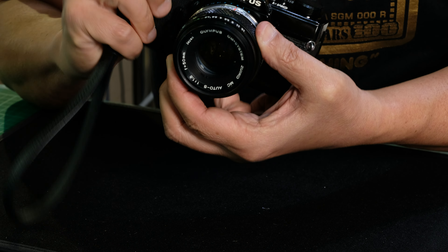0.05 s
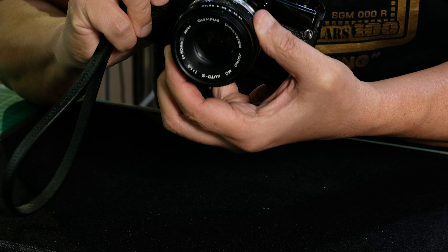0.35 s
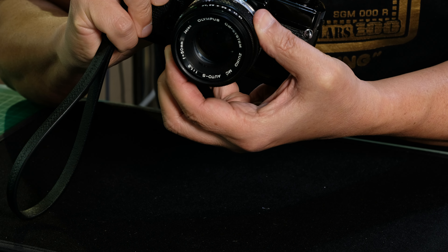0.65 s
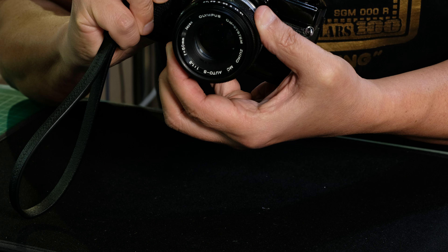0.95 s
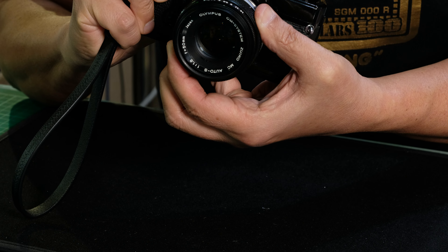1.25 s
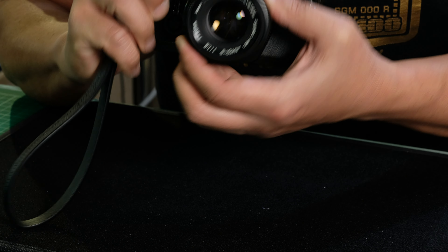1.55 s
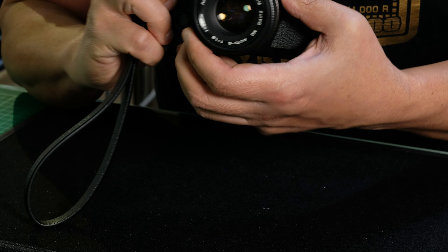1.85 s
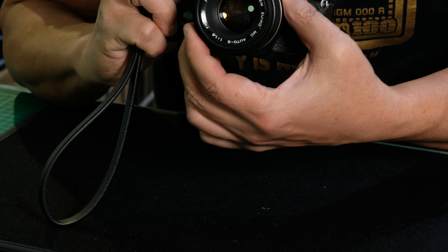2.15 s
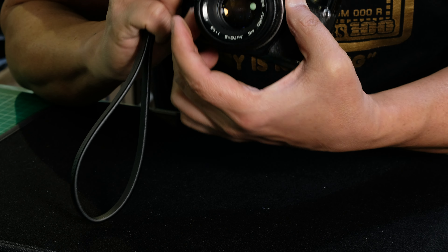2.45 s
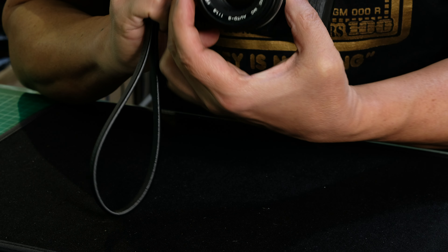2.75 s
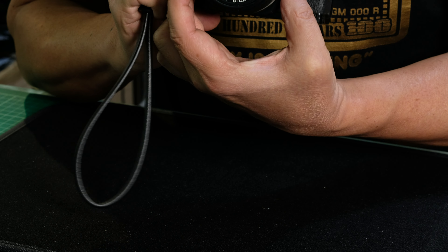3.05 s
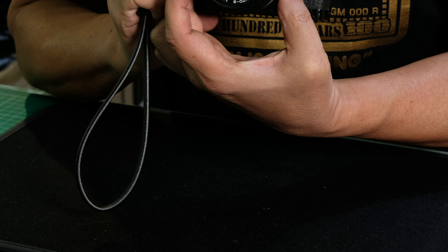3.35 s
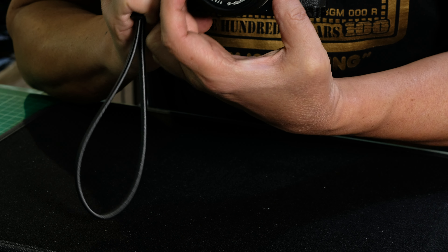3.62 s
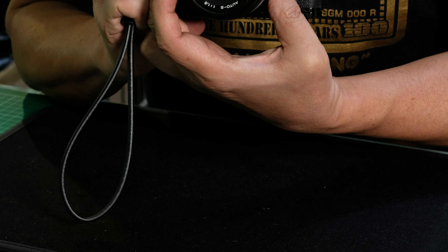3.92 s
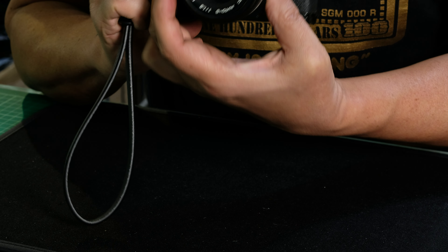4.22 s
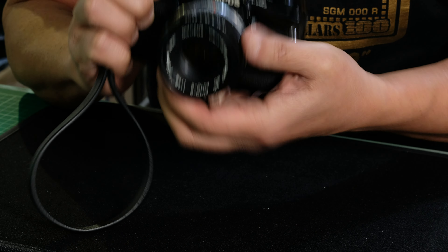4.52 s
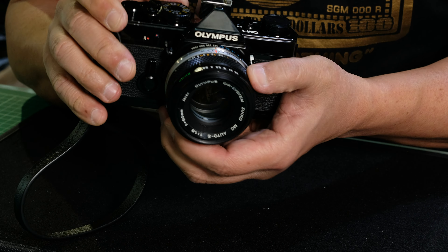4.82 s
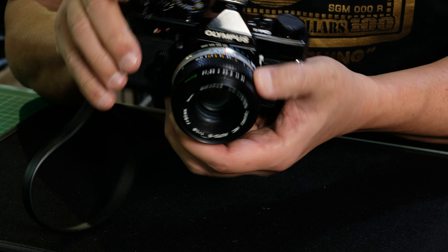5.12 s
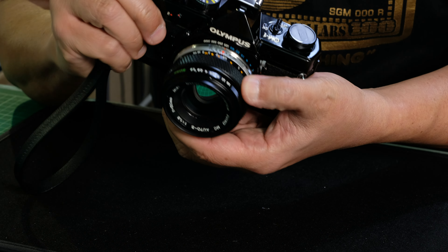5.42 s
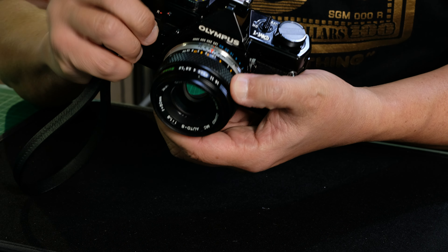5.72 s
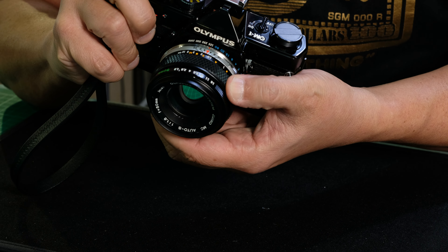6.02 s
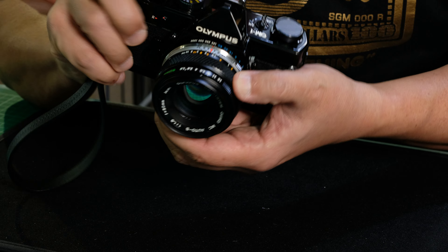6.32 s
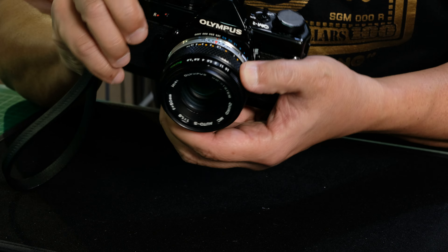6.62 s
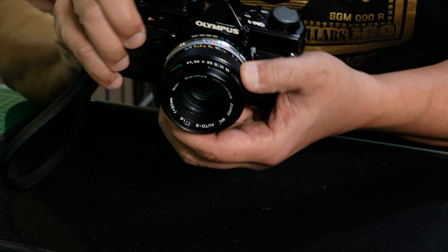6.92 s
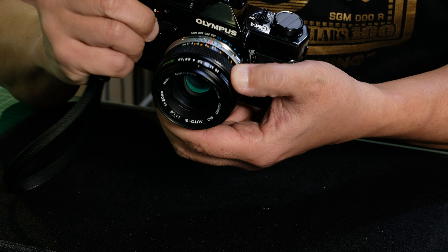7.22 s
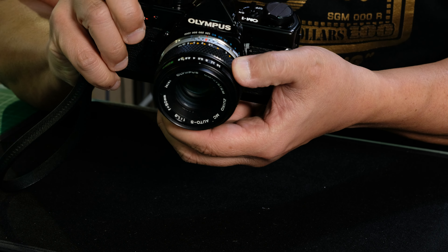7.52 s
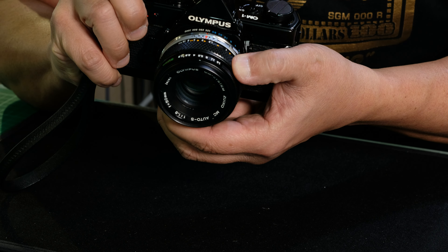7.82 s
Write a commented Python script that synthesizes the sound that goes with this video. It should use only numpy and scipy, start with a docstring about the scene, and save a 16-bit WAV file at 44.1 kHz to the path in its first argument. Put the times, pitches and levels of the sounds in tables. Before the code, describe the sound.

Close up in a small room with faint rumble and hiss, a film camera is worked by hand. After a small ring click comes a slow exposure: two sharp metallic clicks with a soft clockwork whirr between them. Light finger taps and rubs follow. Then, twice over, the film lever gives a short ratcheting rasp and the shutter fires fast, with another ring click before the first of these shots.

```python
"""A soft rub and the click of a speed ring, then a mechanical film camera fires three times, close up
in stereo in a small, quiet room. The first exposure is slow and its escapement whirrs; between shots
fingers tap and rub the body, the film lever ratchets and the ring clicks again.
Blows are fast-dying noise bursts that ring the metal parts; sliding is noise in grains of uneven size.
A short room tail, rumble, hiss and hum lie underneath."""
import sys
import numpy as np
from scipy import signal
from scipy.fft import rfft, irfft, next_fast_len
from scipy.io import wavfile
from scipy.ndimage import uniform_filter1d

SR = 44100
rng = np.random.default_rng(int(sys.argv[2]) if len(sys.argv) > 2 else 0)


def materialize(psi):
    """Save the field psi as 16-bit PCM at rate SR to the path in sys.argv[1].

    A 1-D psi becomes a single channel; in a 2-D psi each row is a channel.
    """
    bounded = np.clip(np.atleast_2d(psi).T, -1, 1)
    quanta = np.round(bounded * 32767).astype(np.int16)
    wavfile.write(sys.argv[1], SR, quanta)


N = 355429
LEAD_S = .004  # scrape ahead of each blow

# Spectra of shutter, film winder and controls: f/Hz, level/dB
SHUTTER_TONE = [(200, -34), (400, -24.5), (680, -13.5), (900, -17), (1600, -16), (1950, -9.5), (2800, -6),
                (5200, -5), (7400, -1.5), (9200, -2), (10400, -9), (12100, 1), (14800, -4), (16000, -14)]
WINDER_TONE = [(180, -56), (300, -23.5), (787, -5.5), (1510, -9.5), (3130, -4), (4230, -6.5), (4750, -8),
               (7950, -2), (10400, -12), (11300, -6.5), (12500, -5.5), (15200, -10), (16000, -8.5)]
CONTROL_TONE = [(300, -28.5), (700, -19.5), (1060, -10), (1380, -25), (1850, -7), (2450, -5), (3500, -4.5),
                (4200, -2), (5200, -4.5), (7500, 2.5), (8700, -3), (9700, -0.5), (11000, -2.5),
                (16000, -4.5)]
# Direct sound: f/Hz, left-right correlation
NEAR_CORRELATION = [(300, .92), (600, 1), (1100, 0.51), (2200, 1), (4400, 0.69), (8000, .66), (15000, .48)]
# Exposures: release/s, close/s, opening/dB, closing/dB, extra closing knock/dB, button up/s, button/dB
SHOTS = [(0.6131, 1.2364, -10, -13, -3.5, 1.4583, -22.5), (6.0979, 6.1656, -8.5, -11.5, -0.5, 6.2942, -21),
         (7.8082, 7.8762, -9, -12.5, 1.5, 7.995, -21.5)]
# Latch frees mirror; mirror hits, chatters, settles; first curtain meets its brake, slides, stops:
# delay/s, level/dB, t60/s, ring/Hz, knock/dB, brightness/dB
OPENING = [(0, -5, 0.012, 12270, -9.5, -2.5), (.0079, 0.5, 0.0046, 12300, -5.5, 0),
           (.0094, -5.5, .016, 7400, -5.5, -2.5), (.036, -20.5, .013, 7200, 17, -2),
           (.0518, -19, .008, 6770, 1.5, -3.5), (.054, -12.5, .008, 12040, -1.5, -4),
           (.0569, -1, .008, 11200, -6.5, 1.4)]
# Film lever strokes: end stop/s, level/dB, time stretch of the tooth run
STROKES = [(5.5435, -14, .992), (7.1674, -13.5, 1.025)]


def amp(db):
    """Decibels to gain."""
    return 10 ** (np.asarray(db) / 20)


def unit(x):
    """Scale to rms 1."""
    return x / np.sqrt(np.mean(x ** 2) + 1e-20)


def along(points, hz):
    """Interpolate (f/Hz, value) points on a log axis."""
    f, v = np.transpose(points)
    return np.interp(np.log(hz + 1), np.log(f), v)


def filtered(x, response):
    """Apply a complex frequency response."""
    size = next_fast_len(N + SR // 2)
    return irfft(rfft(x, size) * response(np.fft.rfftfreq(size, 1 / SR)), size)[..., :N]


def ringing(x, modes):
    """x plus the resonances it shakes; modes: f/Hz, width/Hz, level/dB."""
    return filtered(x, lambda f: 1 + sum(amp(db) * 1j * f * width / (hz * hz - f * f + 1j * f * width)
                                         for hz, width, db in modes))


def minimum_phase(gain):
    """Causal response with the given gains."""
    cepstrum = irfft(np.log(np.maximum(gain, 1e-6)))
    half = len(cepstrum) // 2
    return np.exp(rfft(np.r_[cepstrum[0], 2 * cepstrum[1:half], np.zeros(half)]))


def spread(pair, correlation, hz):
    """Mix two independent spectra into correlated left and right."""
    angle = np.arccos(np.clip(along(correlation, hz), 0, 1)) / 2
    mid, side = pair[0] * np.cos(angle), pair[1] * np.sin(angle)
    return np.array([mid + side, mid - side])


def coloured(pair, tone, correlation):
    """Stereo sound of rms 1 from two excitations and a spectrum."""
    size = next_fast_len(N + SR // 2)
    hz = np.fft.rfftfreq(size, 1 / SR)
    spectrum = spread(rfft(pair, size), correlation, hz) * amp(along(tone, hz))
    return unit(irfft(spectrum, size)[:, :N])


def add(track, s, sound):
    """Mix a sound in at time s."""
    span = track[:, round(s * SR):][:, :sound.shape[1]]
    span += sound[:, :span.shape[1]]


def contact(tone, t60_s, ring_hz, ring_db, knock_db, bright_db):
    """Parts scrape, meet and ring in a crowd of fast-dying modes. Rows: left, right, room send."""
    size, rise_s = 4096, .05 * t60_s
    t, hz = np.arange(size) / SR - LEAD_S, np.fft.rfftfreq(size, 1 / SR)
    age_s = np.maximum(t, 0)
    blow = (1 - np.exp(-age_s / rise_s)) * amp(-60 * age_s / t60_s)
    scrape = amp(-22) * np.exp(-np.abs(t) / .0009)
    burst = rfft(rng.choice([-1, 1], (2, size)) * (blow + scrape))
    burst /= np.sqrt(uniform_filter1d(np.abs(burst) ** 2, size=120))  # a hard blow feeds all bands alike
    beam = minimum_phase(amp(ring_db / (1 + ((hz - ring_hz) / 650) ** 2)))  # one mode faces the mic
    direct = beam * spread(burst, NEAR_CORRELATION, hz)
    send = np.exp(-2j * np.pi * hz * (LEAD_S + rise_s))  # modes even out over all directions
    colour_db = along(tone, hz) + knock_db / (1 + (hz / 1300) ** 4)
    colour_db += bright_db * np.tanh(np.log((hz + 1) / 6500) * 2)
    click = irfft(np.vstack([direct, send]) * minimum_phase(amp(colour_db)))
    return click / np.linalg.norm(click[:2].mean(0)) * np.sqrt(SR / 1000)  # energy of 1 ms at rms 1


def clicks(rows, tone, ring_db, gain_db=0):
    """Mix contacts; rows: t/s, level/dB, t60/s, ring/Hz, knock/dB, brightness/dB."""
    out = np.zeros((3, N))
    for s, db, t60_s, ring_hz, knock_db, bright_db in rows:
        click = contact(tone, max(t60_s, .002), ring_hz, ring_db, knock_db, bright_db)
        add(out, s - LEAD_S, amp(db + gain_db) * click)
    return out


def placed(run, s, db, knock_db=0, stretch=1):
    """Rows for a run of contacts set off at time s."""
    return [(s + stretch * delay_s, db + level_db, t60_s, hz, knock + knock_db, bright_db)
            for delay_s, level_db, t60_s, hz, knock, bright_db in run]


def friction(spans, tone, scatter_db, slips_per_s):
    """Tiny uneven slips that swell and fade; spans: start/s, end/s, level/dB."""
    t = np.arange(N) / SR
    swell = sum(amp(db) * np.sqrt(np.abs(np.sin(np.pi * np.clip((t - start) / (end - start), 0, 1))))
                for start, end, db in spans)
    slips = amp(scatter_db * rng.standard_normal(N))[(t * slips_per_s).astype(int)]
    return swell * coloured(slips * rng.standard_normal((2, N)), tone, NEAR_CORRELATION)


def background(floor_db=-58.5, hum_gain_db=-1):
    """Low room rumble, faint hiss and steady hum."""
    partials = [(48.4, -70.5), (96.9, -74.5), (199.2, -67.5)]  # f/Hz, level/dB
    floor_tone = [(20, 1), (55, -1), (70, -11.5), (115, -3), (172, -11), (210, -9), (330, -14.5),
                  (660, -21), (780, -20), (1200, -27.5), (3900, -33.5), (5200, -38), (12000, -40),
                  (16000, -46.5)]  # f/Hz, level/dB
    correlation = [(60, 0.29), (180, 0.8), (550, 0.36), (1650, 0.41), (4970, 0.37), (15000, 0.04)]  # f/Hz, left-right correlation
    t = np.arange(N) / SR
    hum = sum(amp(db + hum_gain_db) * np.sqrt(2) * np.sin(2 * np.pi * (hz * t + rng.random()))
              for hz, db in partials)
    return hum + amp(floor_db) * coloured(rng.standard_normal((2, N)), floor_tone, correlation)


def finger_rubs():
    """Skin slides on the body."""
    rubs = [(.1, .16, -70), (1.32, 1.83, -68.5), (1.95, 2.3, -73), (2.975, 3.035, -56.5),
            (3.06, 3.1, -64.5), (4.28, 4.72, -70), (5.62, 5.82, -73.5), (6.36, 6.41, -63.5),
            (7.36, 7.46, -69)]  # start/s, end/s, level/dB
    skin_tone = [(200, -30), (700, -9), (1400, -8.5), (2500, 1.5), (4200, -0.5), (5200, -9), (7500, 1),
                 (10500, -9.5), (12500, -0.5), (16000, -13)]  # f/Hz, level/dB
    return friction(rubs, skin_tone, scatter_db=6.5, slips_per_s=600)


def speed_ring():
    """A detent ball leaves its notch and snaps into the next; the ring resonates."""
    turns = [(0.1614, -16), (5.8451, -15), (7.4422, -33)]  # t/s, level/dB
    detent = [(-.0052, -29, .007, 4300, 3, -5), (0, -0.5, .009, 9600, 2.5, 0.5)]  # delay/s, level/dB, t60/s, ring/Hz, knock/dB, brightness/dB
    ring_modes = [(1760, 95, -2), (2350, 43, -8.5), (4150, 80, -6), (6690, 80, -10), (7280, 110, -9)]  # f/Hz, width/Hz, level/dB
    rows = [row for s, db in turns for row in placed(detent, s, db)]
    return ringing(clicks(rows, CONTROL_TONE, ring_db=3, gain_db=-.5), ring_modes)


def finger_taps(tick_count=20):
    """Fingers tap and bump the hollow body; the shifting grip adds faint random ticks."""
    taps = [(1.6847, -49.5, 3), (1.9278, -52, 4.5), (2.215, -53, 4), (2.4536, -55.5, -3.5),
            (2.5299, -41, 0), (2.6058, -33.5, 3), (2.788, -47.5, 0), (2.938, -45, 1.5), (2.9823, -46.5, 1),
            (3.0254, -45, 3), (3.2456, -46.5, -0.5), (3.792, -58.5, -7), (4.052, -36, 4), (4.4946, -36, 7),
            (4.5667, -44.5, 8.5), (4.8115, -56, -9), (5.3639, -48, 1), (5.6658, -49, 3),
            (5.6843, -46.5, 2.5), (6.0223, -48, 5), (6.5007, -51, 1.5), (6.7617, -50.5, -5),
            (7.2827, -45.5, 0), (7.7451, -46.5, 10)]  # t/s, level/dB, brightness/dB
    tap_tone = [(200, -27), (700, -2.5), (1400, -8), (2400, 1.5), (4000, -3.5), (8000, -1.5), (12000, -5.5),
                (16000, -3)]  # f/Hz, level/dB
    bumps = [(1.962, -53.5, 810, 0.052), (5.153, -41, 610, 0.036), (5.3835, -30.5, 670, 0.012),
             (5.3852, -35, 970, 0.012)]  # t/s, level/dB, f/Hz, t60/s
    tick_s = np.linspace(LEAD_S, N / SR, tick_count, endpoint=False)
    tick_s += rng.random(tick_count) * (N / SR / tick_count - LEAD_S)
    ticks = [(s, -61 + 2.5 * force, 6 * colour)
             for s, (force, colour) in zip(tick_s, rng.standard_normal((tick_count, 2)))]
    out, t = np.zeros((3, N)), np.arange(SR // 8) / SR
    for s, db, bright_db in list(taps) + ticks:
        tap = contact(tap_tone, t60_s=.011, ring_hz=4020, ring_db=4.5, knock_db=-3.5, bright_db=bright_db)
        add(out, s - LEAD_S, amp(db) * tap)
    for s, db, hz, t60_s in bumps:
        envelope = amp(db - 60 * t / t60_s) * (1 - np.exp(-t / .001))
        add(out, s, envelope[None] * np.sin(2 * np.pi * hz * t))
    return out


def shutter():
    """Mirror and curtains hit their stops, shaking the metal shell and the slow-dying springs."""
    # Second curtain lands; mirror drops, rebounds; linkage falls back
    closing = [(-.0028, -3.5, .008, 7700, -1, -1), (0, -0.5, .012, 7200, 4.5, -1.5),
               (.0075, -13, .012, 7560, 4.5, -5.5), (.031, -21, 0.018, 2940, 8.5, -3),
               (.051, -20, 0.013, 5200, 6, -4)]  # delay/s, level/dB, t60/s, ring/Hz, knock/dB, brightness/dB
    shell_modes = [(2050, 70, -7.5), (3019, 90, -8.5), (3820, 70, -5.5), (6710, 80, -12), (7467, 190, -7.5),
                   (7963, 120, -8), (9100, 59, -6), (11900, 130, -12), (12220, 120, -11.5)]  # f/Hz, width/Hz, level/dB
    spring_modes = [(618, 2, 1), (696, 2, 1)]  # f/Hz, width/Hz, level/dB
    rows = []
    for release_s, close_s, open_db, close_db, knock_db, *_ in SHOTS:
        rows += placed(OPENING, release_s, open_db) + placed(closing, close_s, close_db, knock_db)
    return ringing(clicks(rows, SHUTTER_TONE, ring_db=3.5), shell_modes + spring_modes)


def curtains():
    """Cloth curtains slide across the film gate; after the second, the mirror linkage runs down."""
    first = [(0.043, 0.053, -31.5)]  # start/s, end/s, level/dB; relative to release
    second = [(-.014, 0, -18.5), (.006, 0.045, -27.5)]  # start/s, end/s, level/dB; relative to closing
    spans = []
    for release_s, close_s, open_db, close_db, *_ in SHOTS:
        for s, db, runs in [(release_s, open_db, first), (close_s, close_db, second)]:
            spans += [(s + start_s, s + end_s, db + run_db) for start_s, end_s, run_db in runs]
    return friction(spans, SHUTTER_TONE, scatter_db=-.5, slips_per_s=720)


def escapement(tick_hz=380, jitter=.15, t60_s=.022, scatter_db=2, rise_s=.11, growth_db_per_s=9):
    """A rocking pallet brakes the gears during the slow first exposure; its ticks blur into a whirr."""
    tick_tone = [(300, -23), (680, -7), (1000, -20.5), (1550, -14.5), (2800, -5), (4400, -9), (5600, -5.5),
                 (6300, -7.5), (8200, -3), (9300, -6.5), (10700, -15.5), (11800, -6), (14000, -5.5),
                 (16000, -13)]  # f/Hz, level/dB
    plate_modes = [(2600, 150, -5.5), (2900, 180, -3), (4160, 300, -12), (5760, 220, 1.5), (7990, 150, 2.5),
                   (8340, 170, 3.5), (9330, 180, -2), (11800, 280, 0.5), (14300, 300, -6)]  # f/Hz, width/Hz, level/dB
    t = np.arange(N) / SR
    rate_hz = tick_hz * (1 + jitter * rng.standard_normal(N)[(t * tick_hz).astype(int)]).clip(.1)
    teeth = np.cumsum(rate_hz) / SR
    age_s = (teeth % 1) / tick_hz
    ticks = amp(scatter_db * rng.standard_normal(N)[teeth.astype(int)] - 60 * age_s / t60_s)
    whirr = ringing(coloured(ticks * rng.standard_normal((2, N)), tick_tone, NEAR_CORRELATION), plate_modes)
    release_s, close_s = SHOTS[0][:2]
    running_s = t - release_s - OPENING[-1][0]  # since the first curtain stopped
    gate = np.clip(running_s / rise_s, 0, 1) * (t < close_s)
    return gate * amp(-57 + growth_db_per_s * running_s) * unit(whirr)


def release_button():
    """The button springs back and bounces after each exposure."""
    rebound = [(0, 0, 0.0094, 13400, 3.5, 5), (.0095, -17.5, 0.0096, 2300, 4, 0.5)]  # delay/s, level/dB, t60/s, ring/Hz, knock/dB, brightness/dB
    rows = [row for *_, s, db in SHOTS for row in placed(rebound, s, db)]
    return clicks(rows, CONTROL_TONE, ring_db=9)


def film_lever(rattle_knock_db=-2, rattle_bright_db=1.5):
    """The lever rattles in its play, then its pawl skips over the teeth, faster and harder, to the stop."""
    play = [(5.1489, -27.5, 0.029, 2250), (5.167, -38, .011, 8000), (5.1746, -33, 0.0116, 9550),
            (5.2534, -40.5, .0094, 4420), (5.3537, -37.5, 0.01, 6970), (5.4317, -38, 0.0055, 7360),
            (6.9118, -32.5, 0.0156, 2370), (6.9377, -35.5, 0.0067, 8600), (6.9438, -35, 0.023, 9400),
            (7.0327, -42, 0.015, 7100), (7.0686, -31, 0.0098, 14500)]  # t/s, level/dB, t60/s, ring/Hz
    tooth_run = [(-.0775, -15.5, 0.0102, 4450, -13, 0.5), (-.0588, -12.5, .012, 4380, -4, 3),
                 (-.0428, -11.5, 0.0033, 3180, -3, 6.5), (-.0322, -10.5, .009, 7050, 5.5, 6.5),
                 (-.0222, -9, 0.0103, 8100, -5.5, 1)]  # delay from stop/s, level/dB, t60/s, ring/Hz, knock/dB, brightness/dB
    end_stop = [(0, 0, 0.006, 9000, -7, 8.5), (.0433, -5, .008, 11600, -19, 6.5),
                (.0665, -14.5, .006, 12300, -9, 11.5)]  # same columns; lever hits, pawl drops in, lever comes home
    wheel_modes = [(3200, 230, -7), (4400, 280, 0), (7060, 350, 0)]  # f/Hz, width/Hz, level/dB
    rattles = [(*rattle, rattle_knock_db, rattle_bright_db) for rattle in play]
    teeth = [row for s, db, stretch in STROKES for row in placed(tooth_run, s, db, stretch=stretch)]
    stops = [row for s, db, _ in STROKES for row in placed(end_stop, s, db)]
    wheel = ringing(clicks(teeth, WINDER_TONE, ring_db=7, gain_db=-2), wheel_modes)
    return wheel + clicks(rattles + stops, WINDER_TONE, ring_db=6.5, gain_db=-1)


def gear_drag(slack_s=.17, pull_s=.075, overrun_s=.016):
    """The lever swings; the gears drag lightly as they take up the film, hardest just before the stop."""
    swings = [(5.25, 5.31, -53.5), (6.895, 6.965, -59), (6.975, 7.06, -54), (7.18, 7.26, -60.5)]  # lever out or back: start/s, end/s, level/dB
    slack = [(stop_s - slack_s, stop_s - pull_s / 2, db - 44) for stop_s, db, _ in STROKES]
    pull = [(stop_s - pull_s, stop_s + overrun_s, db - 34) for stop_s, db, _ in STROKES]
    return friction(list(swings) + slack + pull, WINDER_TONE, scatter_db=4, slips_per_s=1100)


def room(send, build_s=.00061, segments=14):
    """A short diffuse tail, drawn anew for each time segment as the camera moves."""
    decay = [(200, .35), (800, .3), (2500, 0.28), (7000, 0.28), (12000, 0.14), (16000, 0.061)]  # f/Hz, t60/s
    correlation = [(300, 0.99), (3000, .75), (7000, 0.29), (15000, .1)]  # f/Hz, left-right correlation
    wet_tone = [(500, -12), (1300, -8.5), (2500, -11), (7000, -15.5), (14000, -11.5)]  # f/Hz, level/dB
    out = np.zeros((2, N))
    for part in np.array_split(np.arange(N), segments):
        hz, t, noise = signal.stft(rng.standard_normal((2, SR // 2)), SR, nperseg=256)
        bands = spread(noise, correlation, hz[:, None]) * amp(-60 * t / along(decay, hz)[:, None])
        tail = signal.istft(bands * (1 - np.exp(-t / build_s)), SR)[1]
        tail /= np.linalg.norm(tail[0])
        add(out, part[0] / SR, signal.fftconvolve(send[None, part], tail, axes=1))
    return filtered(out, lambda f: amp(along(wet_tone, f)))


def scene():
    """Blows and sliding parts, heard directly and through the room."""
    body_modes = [(2500, 250, -8), (2940, 160, -9), (4210, 410, -4)]  # top plate and lens barrel: f/Hz, width/Hz, level/dB
    blows = shutter()
    blows += ringing(speed_ring() + release_button() + finger_taps() + film_lever(), body_modes)
    sliding = ringing(gear_drag(), body_modes) + curtains() + escapement() + finger_rubs()
    reverb = room(blows[2] + sliding.mean(0))
    return blows[:2] + sliding + reverb + background()


def record(dry):
    """Steep low-pass at 16 kHz."""
    return filtered(dry, lambda hz: 1 / (1 + (hz / 16000) ** 120))


dry = scene()
out = record(dry)
materialize(out)
```